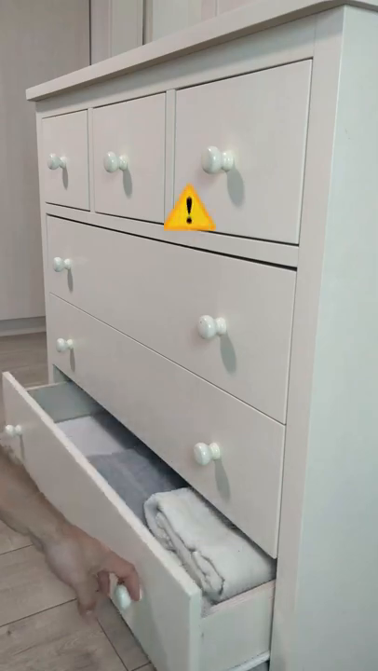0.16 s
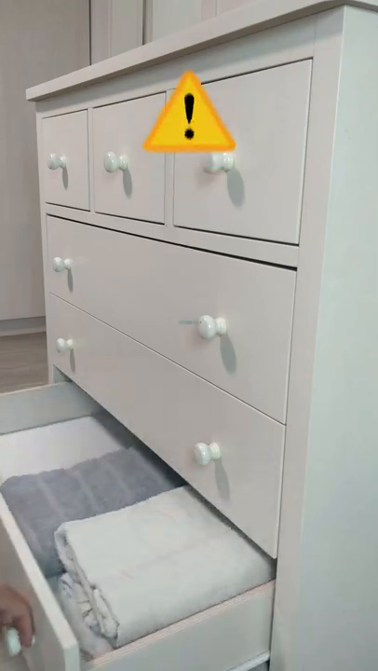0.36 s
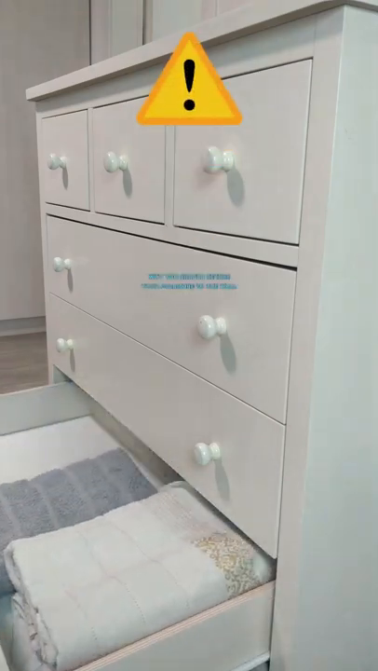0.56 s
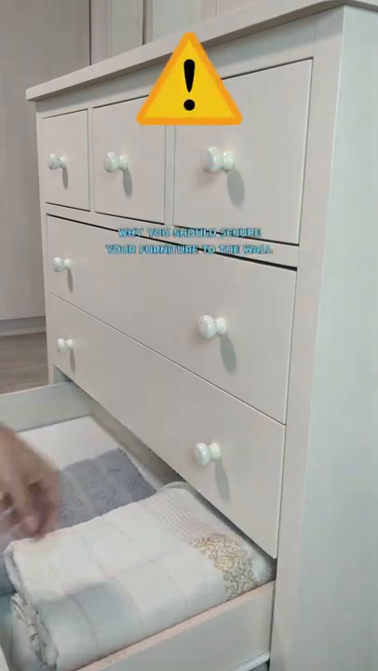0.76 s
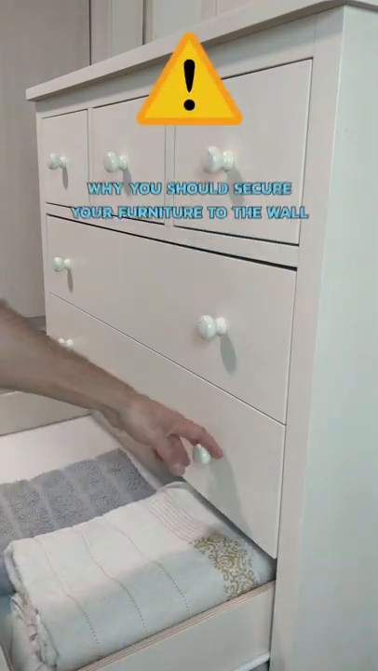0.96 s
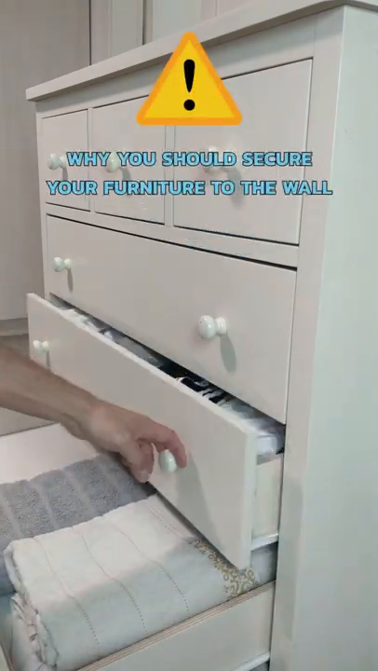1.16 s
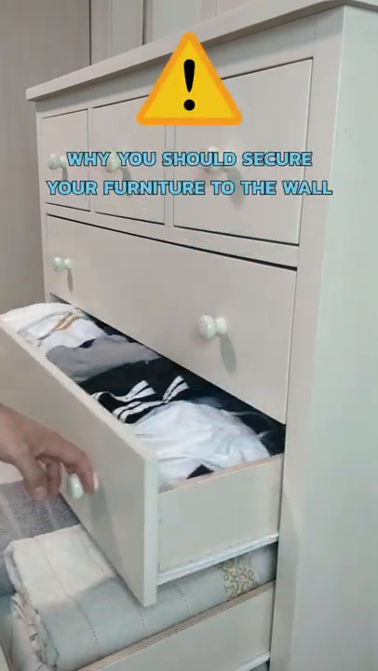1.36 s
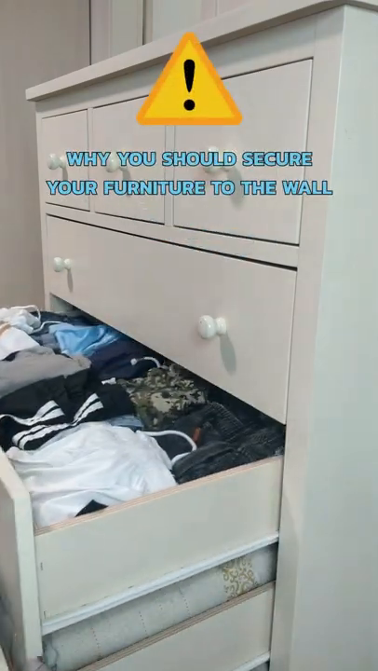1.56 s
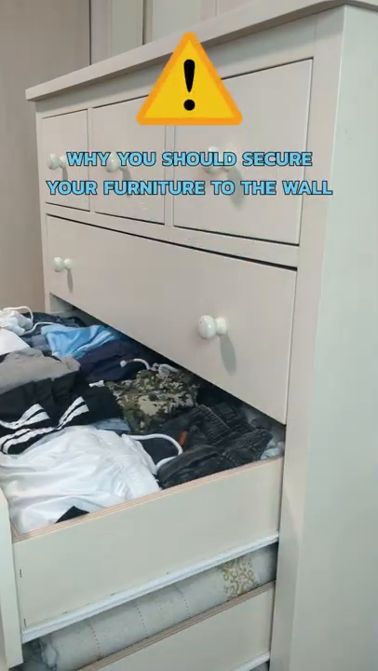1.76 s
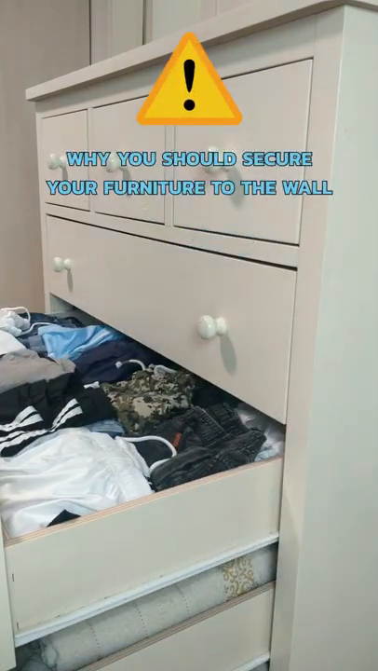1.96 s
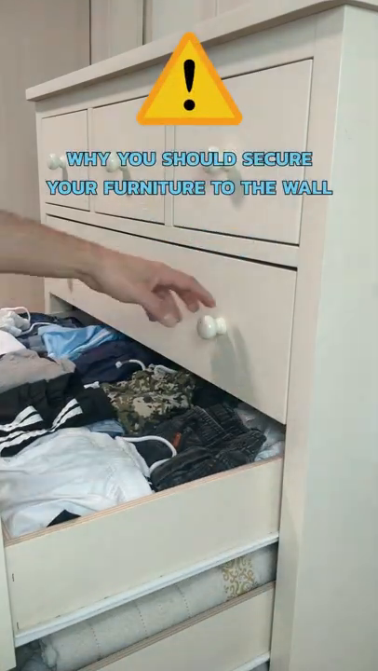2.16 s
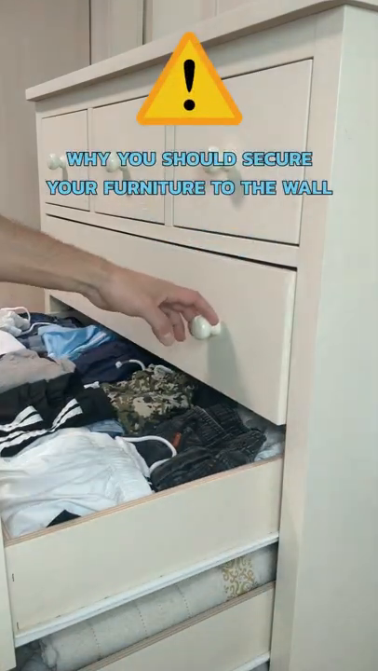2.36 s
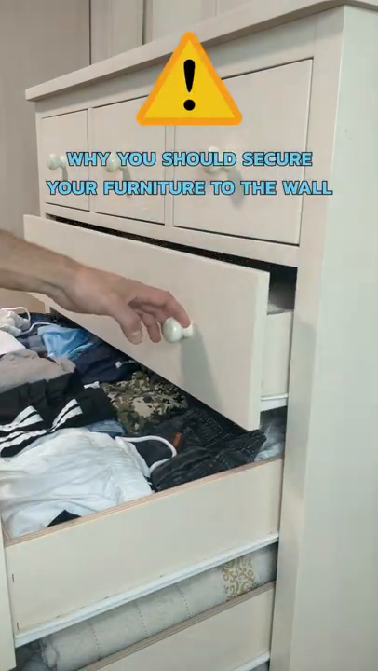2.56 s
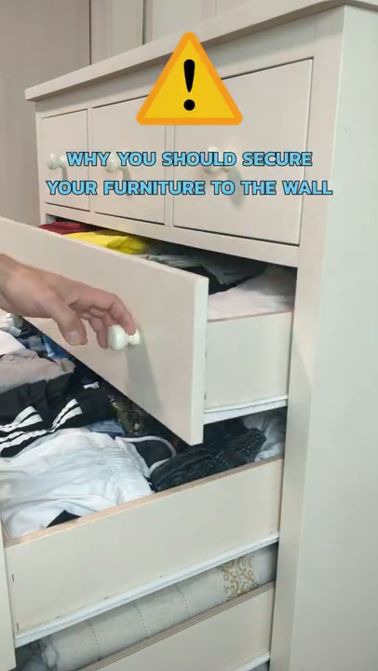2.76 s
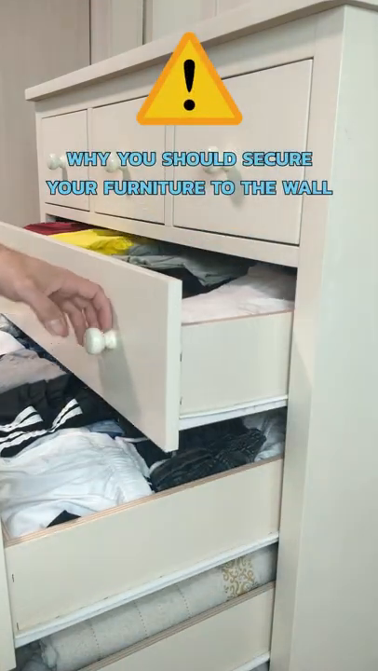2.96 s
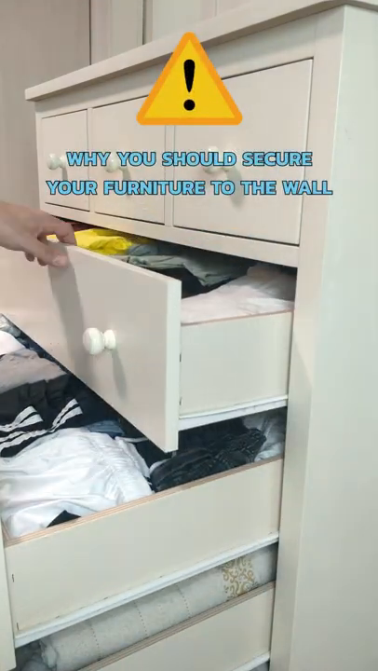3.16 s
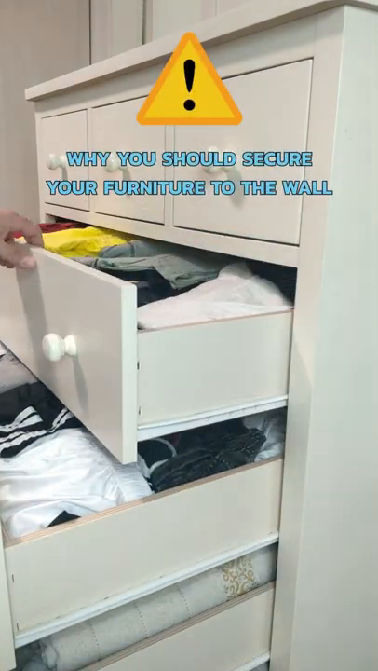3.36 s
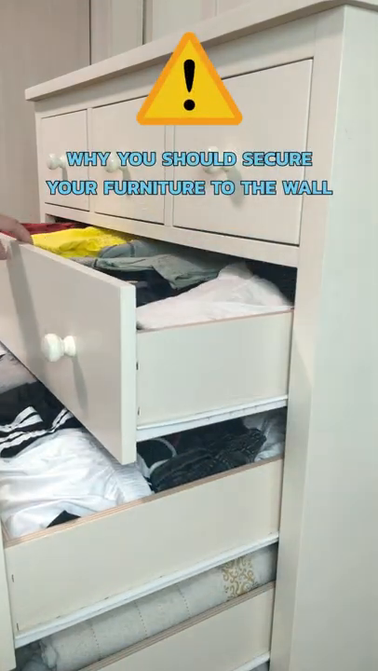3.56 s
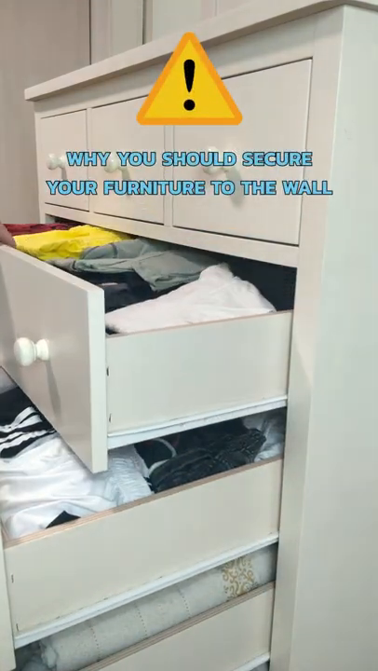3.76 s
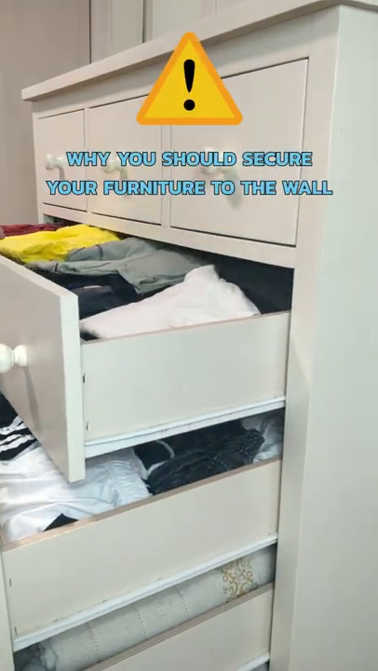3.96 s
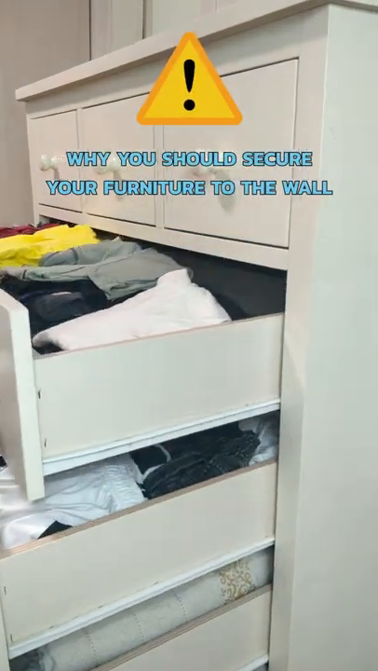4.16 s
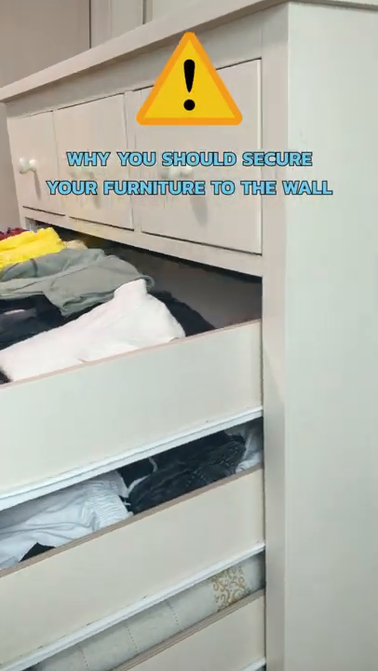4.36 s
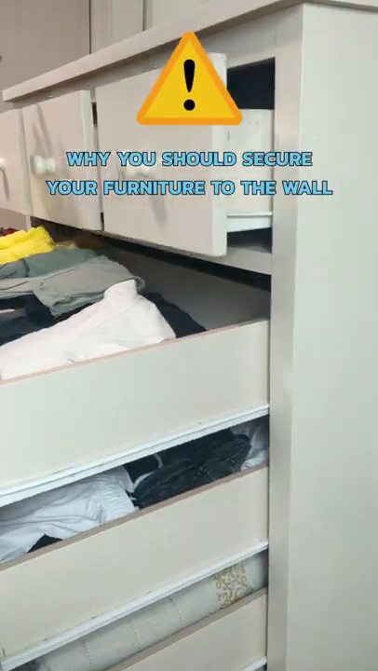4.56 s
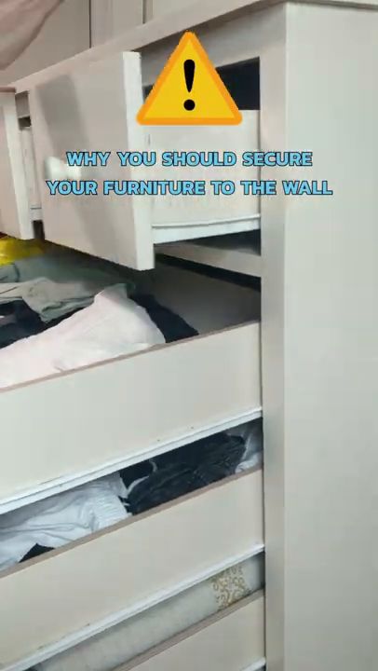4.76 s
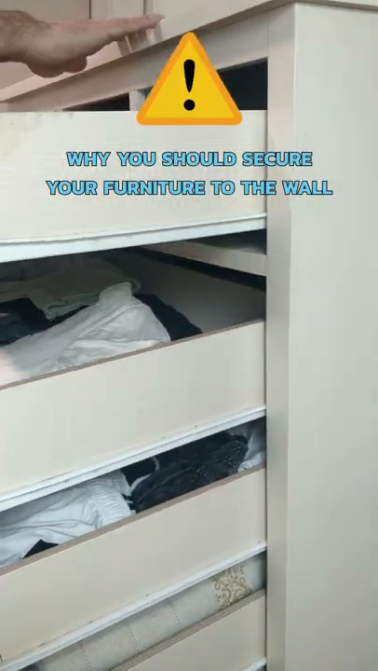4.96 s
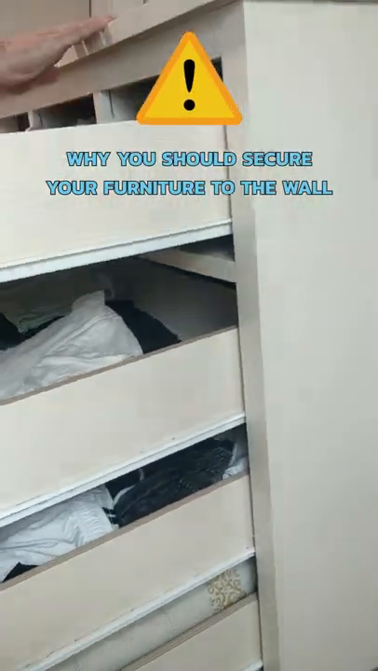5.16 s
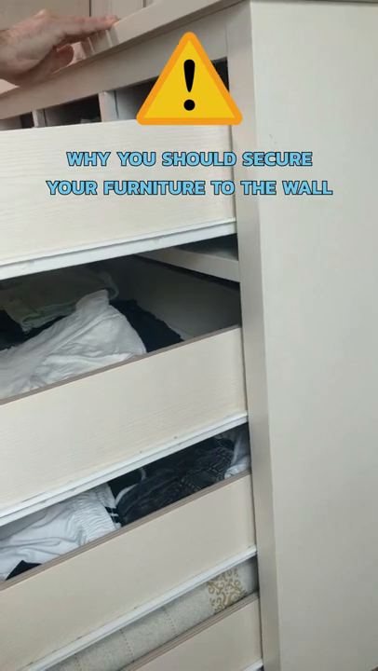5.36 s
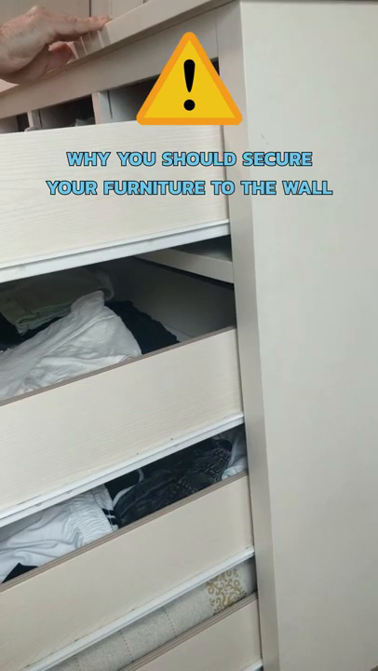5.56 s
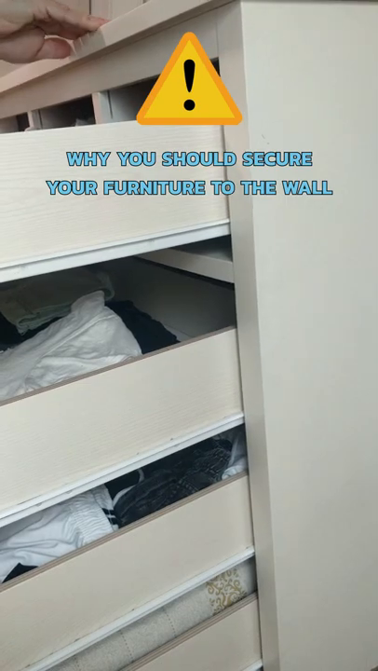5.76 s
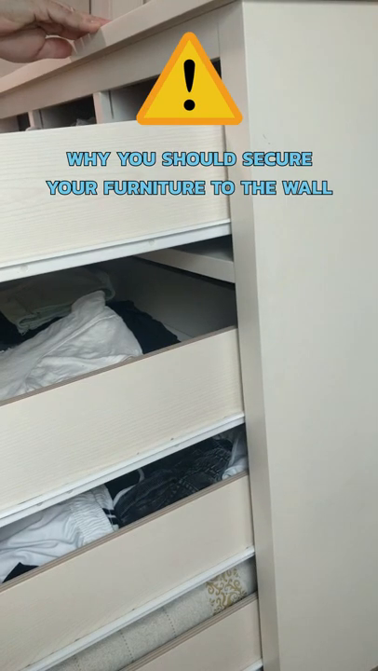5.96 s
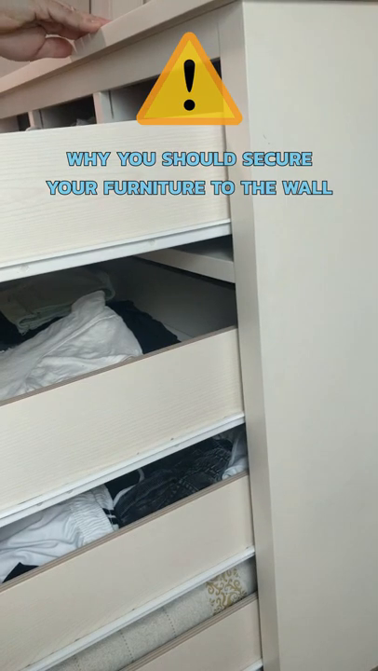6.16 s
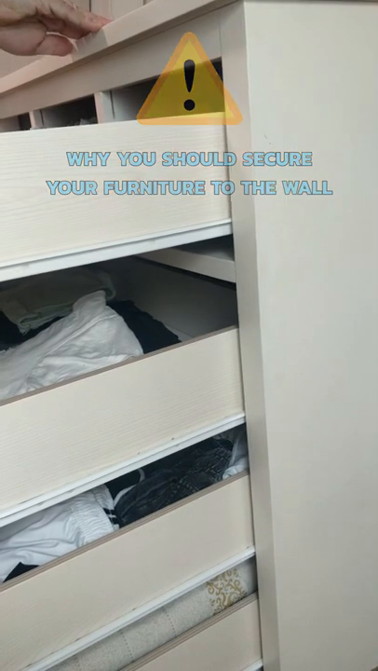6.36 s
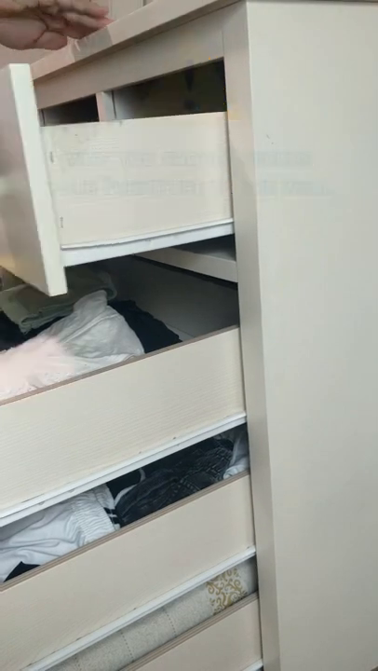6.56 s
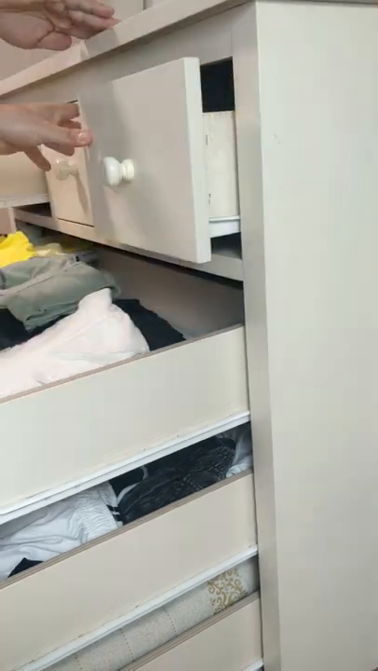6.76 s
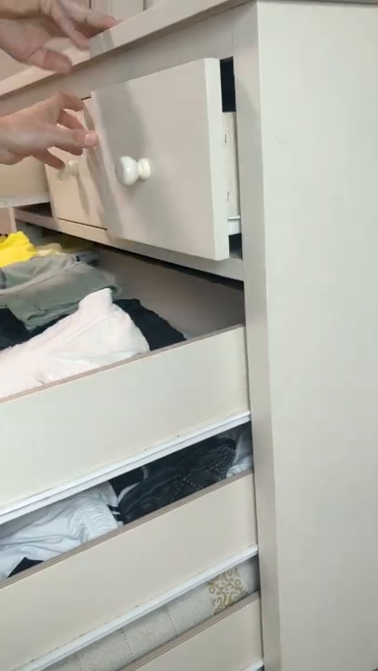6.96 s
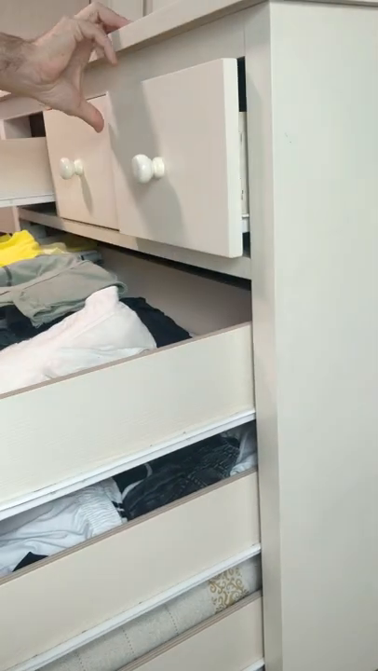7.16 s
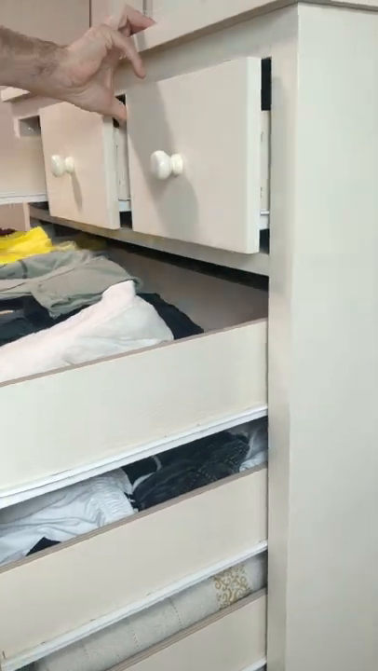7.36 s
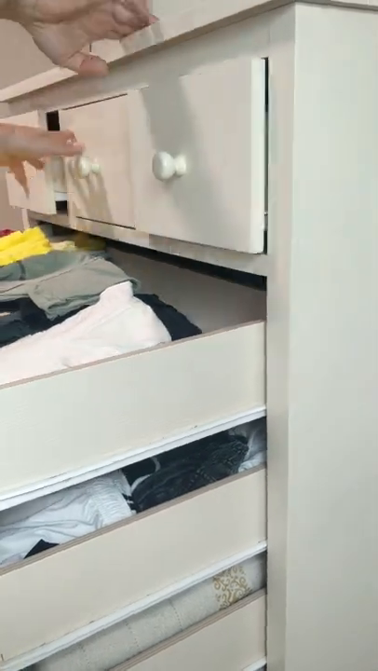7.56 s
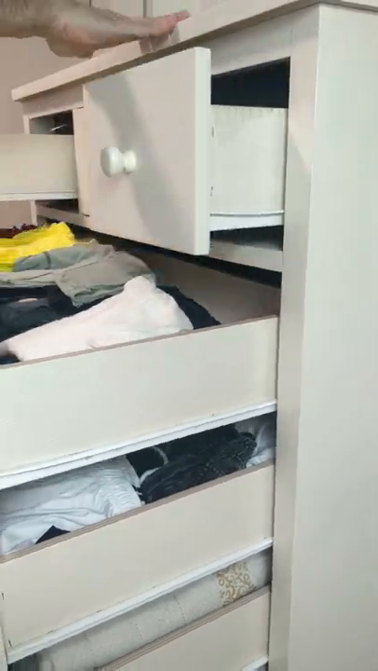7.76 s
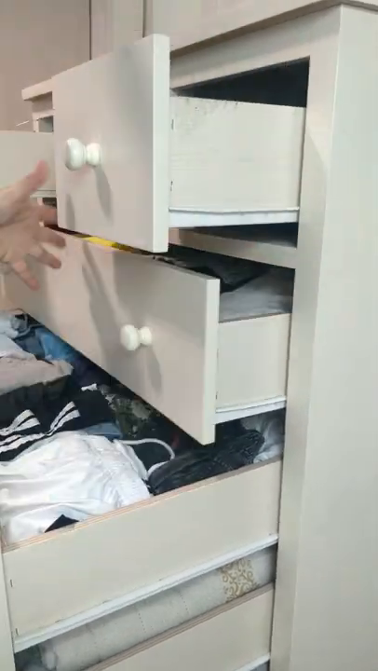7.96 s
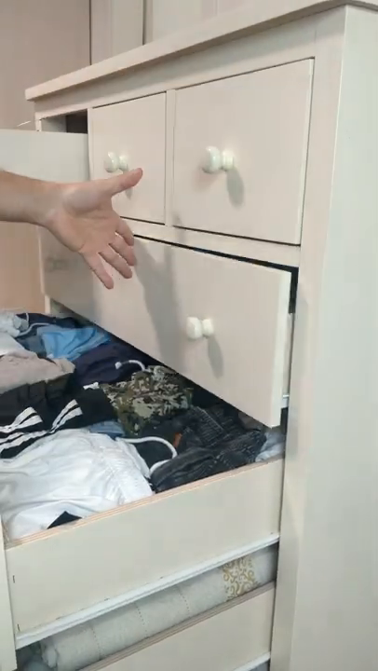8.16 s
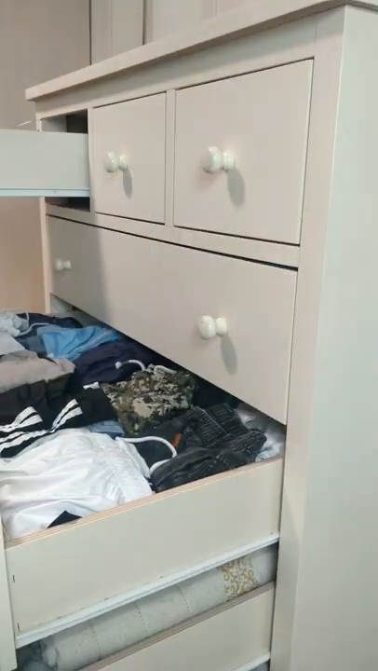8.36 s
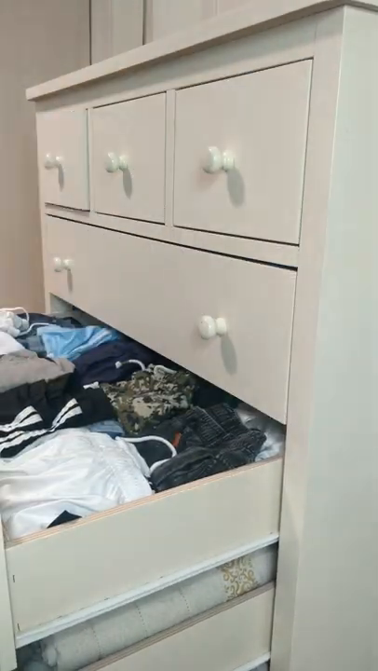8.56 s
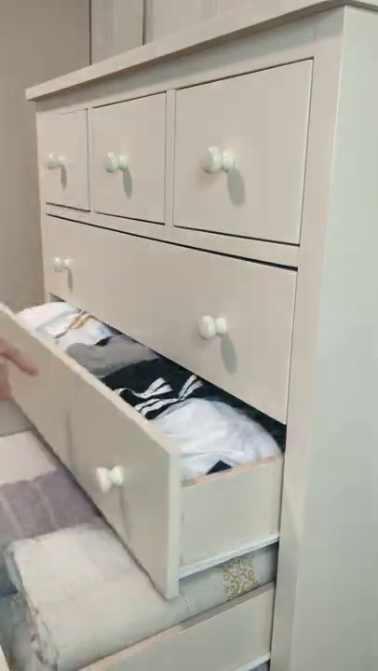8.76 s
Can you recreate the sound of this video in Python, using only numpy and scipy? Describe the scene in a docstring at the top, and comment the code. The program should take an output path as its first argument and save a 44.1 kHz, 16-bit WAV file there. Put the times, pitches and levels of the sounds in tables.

```python
"""In a quiet bedroom, the drawers of a clothes-filled wooden chest are pulled out and later slammed shut.
Each slide is filtered noise that grows with the drawer's speed; some strokes add a pitched roller whirr.
Knocks mix short noise with the ringing of wood panels; booms are low, fading tones.
Straining joints give dry ticks, short bursts of bright noise, as when the chest leans forward.
A short room tail and a faint steady room tone surround it all."""
import sys
import numpy as np
from scipy import signal
from scipy.fft import rfft, irfft, next_fast_len
from scipy.io import wavfile
from scipy.ndimage import uniform_filter1d

SR = 44100
rng = np.random.default_rng(int(sys.argv[2]) if len(sys.argv) > 2 else 0)


def generate_wav(signal):
    """Clip the signal to [-1, 1] and save it as 16-bit WAV at the path in sys.argv[1]."""
    frames = np.transpose(np.atleast_2d(signal))
    scaled = np.clip(frames, -1, 1) * 32767
    pcm = np.round(scaled).astype(np.int16)
    wavfile.write(sys.argv[1], SR, pcm)


N = 392490

# Pulls of a drawer, with faint rubs, a small settle and rattling after a slam. Each row: start in
# seconds, speeding up in seconds, slowing down in seconds, then at top speed: rumble level in dB,
# scrape level in dB, hiss level in dB.
PULLS = [(-0.12, 0.19, 0.19, -38.5, -57, -55.5), (0.06, 0.15, 0.44, -33, -38, -45.5),
         (1.06, 0.29, .33, -32, -40, -49.5), (1.47, 0.088, 0.077, -32, -43, -62.5),
         (1.69, .13, 0.35, -67, -58, -66), (2.22, 0.53, 0.25, -39, -55.5, -60),
         (2.8, .04, 0.16, -44, -55.5, -65.5), (3.075, .02, 0.047, -54, -54, -59),
         (3.21, .12, .1, -46, -57, -67.5), (3.55, 0.12, .26, -53, -69, -79), (3.85, 0.2, 1, -55, -67, -76),
         (4.354, 0.19, 0.23, -28.5, -42.5, -55), (4.68, .18, 0.33, -29.5, -36.5, -52),
         (5.154, 0.056, 0.29, -47, -61.5, -63)]
# Strokes that roll a drawer back in. Each row: the same columns as above.
PUSHES = [(6.35, .27, 0.2, -39, -38, -47), (6.914, 0.088, 0.041, -42, -54, -66.5),
          (7.075, 0.05, 0.086, -52.5, -55.5, -68.5), (7.265, .07, 0.2, -36.5, -37, -49.5),
          (7.37, 0.11, .32, -32.5, -34.5, -44.5), (7.6, 0.28, 0.25, -31, -35, -45.5),
          (8.033, .028, 0.26, -27, -30, -41.5), (8.4, 0.077, 0.23, -36.5, -34, -38.5),
          (8.615, 0.16, 0.2, -33, -38, -45.5)]
# How much quieter a creeping drawer is than one at top speed: rumble in dB, scrape in dB, hiss in dB.
PULL_SWING_DB = [15, 22, 18]
PUSH_SWING_DB = [19.5, 25, 26.5]
GRIP_SPEED = 0.14   # share of top speed below which the runners fade to silence
# Noise colours of the two kinds of slide. Each row: frequency in Hz, relative level in dB.
PULL_COLOUR = [(70, -34), (110, -11.5), (150, 0), (200, -4.5), (255, 1.5), (380, -10), (450, -8.5),
               (590, -23.5), (780, -16.5), (1060, -26), (3000, -32), (4800, -28), (9500, -31.5),
               (16000, -42.5)]
PUSH_COLOUR = [(71, -42), (120, -8), (217, -17.5), (278, -1), (393, -6), (473, 2.5), (684, -16.5),
               (773, -4), (1120, -16), (1400, -15), (2020, -27.5), (2380, -29.5), (3110, -34),
               (4680, -32.5), (16000, -44)]
# Resonances of the drawer boxes. Each row: frequency in Hz, width in Hz, lift in dB.
WIDE_BOX = [(269, 66, 5), (459, 17, 6), (674, 150, 4.5), (1255, 96, 8.5)]
SMALL_BOX = [(294, 50, 2.1), (464, 39, 1.8), (1340, 460, 5.3), (2520, 570, 6.1)]
# Edges in Hz of the rumble, scrape and hiss ranges.
SLIDE_EDGES_HZ = [90, 550, 2500, 17000]
# Colour of the quiet room. Each row: frequency in Hz, relative level in dB.
ROOM_TONE = [(25, -10), (52, -9), (68, -1), (90, -9.5), (120, -22), (200, -13.5), (290, -27.5), (500, -30),
             (1000, -35.5), (2200, -42.5), (3000, -43), (11000, -44), (16000, -48)]
ROOM_TONE_DB = -54
# Ticks of the strained joints. Each row: start in seconds, relative level in dB.
TICKS = [(0.1808, -22.5), (0.2714, -25), (2.835, -41), (2.917, -39.5), (3.0903, -51), (3.2024, -37.5),
         (3.2796, -42.5), (3.6013, -44), (3.633, -47), (3.7374, -44.5), (3.763, -50), (3.8272, -41),
         (4.007, -41), (4.056, -42), (4.0908, -42), (4.144, -41), (4.2402, -39.5), (4.974, -32),
         (5.424, -49.5), (7.7313, -33), (7.957, -23)]
# Colour of a tick. Each row: frequency in Hz, relative level in dB.
TICK_COLOUR = [(1800, -6), (3000, -2), (7000, -3), (15000, -2.5)]
# Knocks of drawers and frame. Each row: start in seconds, thud level in dB, body level in dB,
# clack level in dB, crack level in dB, rattle length in seconds, ring of the struck part in Hz.
KNOCKS = [(0.585, -33, -27, -29, -35, 0.034, 803), (1.026, -61, -62, -69, -53, 0.047, 3510),
          (1.029, -43.5, -40, -60, -68, 0.015, 247), (1.853, -38, -30, -38, -50, 0.015, 435),
          (2.298, -39, -54.5, -51.5, -56, 0.006, 201), (3.045, -56, -52, -57.5, -74, 0.012, 890),
          (3.187, -46, -60, -58, -68, 0.035, 153), (4.349, -38, -59, -61, -69, 0.027, 151),
          (4.461, -33.5, -31, -33, -43.5, 0.03, 235), (5.092, -26, -21.5, -31.5, -34, 0.026, 247.4),
          (5.164, -61, -39, -25.5, -49, 0.0055, 570), (5.172, -31, -24.5, -23, -39.5, 0.026, 996),
          (5.43, -50, -48.5, -55, -94, 0.0081, 437), (5.467, -52, -41, -52, -83, 0.015, 508),
          (6.143, -66.5, -57.5, -64.5, -90, 0.006, 804), (6.357, -54, -50, -53.5, -73, 0.018, 300),
          (6.434, -57, -44.5, -51.5, -61, 0.0076, 284), (6.767, -46, -24.5, -33.5, -43, 0.006, 454),
          (6.837, -51, -55, -44.5, -60.5, 0.0095, 1470), (6.878, -54, -39.5, -40.5, -53, 0.006, 1380),
          (7.132, -65, -45.5, -76, -68, 0.0074, 503), (7.291, -49, -48, -42.5, -51, 0.045, 1390),
          (7.521, -37, -16.5, -23.5, -33.5, 0.029, 295), (7.591, -47, -18.5, -24.5, -39, 0.013, 253),
          (7.879, -42, -25.5, -27.5, -41.5, 0.02, 357), (8.013, -39.5, -38, -37, -34.5, 0.017, 2610),
          (8.133, -35, -19.5, -21, -23, 0.018, 2620), (8.226, -43, -27, -26, -35.5, 0.0013, 1440),
          (8.576, -36.5, -15.5, -22, -30, 0.017, 342)]
# Colour of the wood noise in a knock. Each row: frequency in Hz, relative level in dB.
KNOCK_COLOUR = [(60, -6), (150, -6), (280, -3), (500, -7), (900, -7), (1500, -13), (2000, -20), (2700, -20),
                (5000, -24.5), (16000, -34)]
# Edges in Hz of the thud, body, clack and crack ranges.
KNOCK_EDGES_HZ = [70, 220, 600, 2000, 17000]
# Time in seconds for the noise of thud, body, clack and crack to fall by 60 dB.
KNOCK_T60_S = [0.12, 0.18, 0.13, 0.098]
# Ways the panels ring. Each row: frequency in Hz, relative level in dB, time to fall by 60 dB in seconds.
PANELS = [(150.3, 3, 0.18), (277.5, 2.5, 0.17), (351, -1.5, 0.11), (427.8, -2.5, 0.21), (503, -4, 0.1),
          (599, -10, 0.16), (740, -5.5, 0.086), (980, -8.5, 0.091), (1218, -5, .1), (1388, -3.5, 0.082),
          (2450, -19, .08), (2690, -16, 0.063), (3810, -19, 0.11)]
# Low swings of the chest's body. Each row: start in seconds, frequency in Hz, level in dB before the
# fade, time to fall by 60 dB in seconds.
BOOMS = [(.6, 39, -39, 1.0), (1.858, 41.8, -36, 0.64), (2.776, 39.8, -33, 0.93), (4.47, 42.3, -31, 0.42),
         (5.112, 153.3, -12.5, 0.19), (7.526, 70.6, -25.5, 1), (7.878, 72, -23.5, 0.94),
         (8.134, 72.6, -21, 0.55), (8.575, 71, -26, 0.79)]
# Whirr of the rollers, one list a stroke. Each row: time in seconds, pitch in Hz, level in dB.
WHIRR = [
    [(1.1, 239.7, -44), (1.22, 246, -28), (1.36, 250.3, -41.5), (1.43, 250.4, -29.5), (1.51, 248.4, -39),
     (1.58, 247.5, -26), (1.62, 243, -54)],
    [(4.74, 336.6, -37), (4.9, 476.5, -37), (4.99, 583, -32), (5.03, 543, -29), (5.06, 486, -43)],
    [(6.5, 803, -46), (6.56, 673, -41), (6.75, 490, -31), (6.92, 450.7, -45), (7.04, 491, -53)],
]
# How alike left and right are. Each row: frequency in Hz, likeness from 0 to 1.
LIKENESS = [(100, 0.98), (400, 0.97), (1000, 0.87), (2400, 0.36), (5000, 0.33), (15000, 0.2)]
# Left gets more of the middle, right more of the top. Each row: frequency in Hz, left minus right in dB.
PORT_BALANCE = [(200, 0), (600, 1.5), (2200, 1.2), (4500, 1.6), (8000, 0.5), (14000, -1)]
CUTOFF_HZ = 16000


def from_db(db):
    """Turn decibels into a gain."""
    return 10 ** (np.asarray(db) / 20)


def rms_one(x):
    """Scale a stereo pair so that the average of its two sides has rms 1."""
    return x / np.sqrt(np.mean(x.mean(axis=0) ** 2) + 1e-20)


def in_time(rows):
    """Draw each column of a curve out to every sample."""
    s, *columns = np.transpose(rows)
    return [np.interp(np.arange(N) / SR, s, column) for column in columns]


def at_hz(points, hz):
    """Read a table between its points, on a log-frequency axis."""
    f, value = np.transpose(points)
    return np.interp(np.log(hz + 1), np.log(f), value)


def band(x, low_hz, high_hz):
    """Keep only one range of frequencies."""
    return signal.sosfilt(signal.butter(4, [low_hz, high_hz], "band", fs=SR, output="sos"), x)


def drift(rate):
    """Wander at random around 0, with straight lines between `rate` random points a second."""
    knots = rng.standard_normal(4000)
    return np.interp(np.arange(N) / SR * rate, np.arange(len(knots)), knots)


def add(out, s, sound):
    """Mix a sound in at time s."""
    i = max(round(s * SR), 0)
    out[:, i:i + sound.shape[-1]] += sound[..., :N - i]


def noise(colour, size, resonances=()):
    """Make coloured stereo noise, alike in the bass, that reaches the left slightly first."""
    n = next_fast_len(size)
    hz = np.arange(n // 2 + 1) * SR / n
    level_db = at_hz(colour, hz)
    for f, width, lift in resonances:
        level_db = level_db + lift / (1 + (2 * (hz - f) / width) ** 2)
    alike = np.clip(at_hz(LIKENESS, hz), 0, 1)
    shares = np.sqrt([1 + alike, 1 - alike])
    mid, side = rfft(rng.standard_normal((2, n))) * from_db(level_db) * shares
    left = irfft(mid + side, n)
    right = np.roll(irfft(mid - side, n), 2)   # two samples later
    return rms_one(np.array([left, right])[:, :size])


def speed(start_s, rise_s, fall_s):
    """One stroke: the drawer's speed arches from rest up to 1 and back to rest."""
    since_start = np.arange(N) / SR - start_s
    return np.sin(np.pi * np.interp(since_start, [0, rise_s, rise_s + fall_s], [0, .5, 1]))


def friction_gains(strokes, swing_db):
    """Rumble, scrape and hiss grow louder with the drawer's speed, each by its own swing in decibels."""
    power = np.zeros((len(swing_db), N))
    for start_s, rise_s, fall_s, *top_db in strokes:
        v = speed(start_s, rise_s, fall_s)
        moving = v > 1e-6
        v = v[moving]
        level_db = np.c_[top_db] - np.c_[swing_db] * (1 - v)
        grip = np.minimum(v / GRIP_SPEED, 1)
        power[:, moving] += (grip * from_db(level_db)) ** 2
    return np.sqrt(power)


def wander(x, depth_db, size):
    """As the contact travels, parts of the sound swell and fade, most strongly the low ones."""
    hz, _, cells = signal.stft(x, SR, nperseg=1024)
    field = rng.standard_normal(cells.shape[1:])
    field = uniform_filter1d(field, size=size, axis=1)   # smooth in time
    field = uniform_filter1d(field, size=2, axis=0)      # smooth in frequency
    depth_db = depth_db / (1 + hz[:, None] / 3000)
    cells = cells * from_db(depth_db * field / field.std())
    return signal.istft(cells, nperseg=1024)[1][:, :N]


def grit(per_s, grain_s):
    """Tiny bumps in the runner, at random moments and of uneven size, each quickly fading."""
    bumps = (rng.random(N) < per_s / SR) * rng.exponential(1, N)
    return signal.lfilter([1], [1, -np.exp(-1 / (grain_s * SR))], bumps + 1e-18)


def slide(gains, colour, box, judder_db, judder_rate, grit_db, patchy_db):
    """Runner friction shakes the drawer box: the load judders, grit roughens the scrape and the hiss."""
    friction = wander(noise(colour, N, box), patchy_db, size=7)
    judder = from_db(judder_db * drift(judder_rate))
    grains = np.sqrt(1 + from_db(grit_db) * grit(per_s=270, grain_s=0.0022))
    out = 0
    for k, gain in enumerate(gains):
        roughness = grains if k else 1   # the rumble has no grit
        part = band(friction * judder * roughness, *SLIDE_EDGES_HZ[k:k + 2])
        # level out the noise's short-term loudness, so the gain curve sets it
        part = part / np.sqrt(uniform_filter1d(part.mean(axis=0) ** 2, size=2000) + 1e-12)
        out = out + gain * part
    return out


def room_tone():
    """The quiet room itself: a faint, steady noise, strongest in the bass."""
    return from_db(ROOM_TONE_DB) * noise(ROOM_TONE, N)


def ticks(level_db, snap_s, tail_db, tail_s):
    """A joint slips: a bright, very short snap with a fainter tail."""
    out, t = np.zeros((2, N)), np.arange(SR // 8) / SR
    for s, db in TICKS:
        fade = np.exp(-t / snap_s) + from_db(tail_db) * np.exp(-t / tail_s)
        add(out, s, from_db(db + level_db) * fade * noise(TICK_COLOUR, len(t)))
    return out


def panel_ring(t):
    """A blow lands on a new spot each time and shares itself differently among the panel modes."""
    ring = 0
    for hz, db, t60 in PANELS:
        uneven_db = db + 2 * rng.standard_normal()
        tone = rng.choice([-1, 1]) * np.sin(2 * np.pi * hz * t)
        ring = ring + from_db(uneven_db - 60 * t / t60) * tone
    return ring


def knocks(modes_db, main_db, main_t60, snap_db, snap_s, rise_s):
    """A drawer meets its stop: a snap, a short rattle, then panel modes and noisy wood die away."""
    out, t = np.zeros((2, N)), np.arange(SR // 3) / SR
    blow = SR // 20   # a knock's levels are those of its first 50 ms
    for s, *levels_db, rattle_s, main_hz in KNOCKS:
        wood = noise(KNOCK_COLOUR, len(t))
        ring = from_db(modes_db) * panel_ring(t)
        # the struck part has its own ring, longer if it is low or rattles
        t60 = (main_t60 + 2 * rattle_s) * np.sqrt(400 / main_hz)
        struck_db = main_db + .4 * at_hz(KNOCK_COLOUR, main_hz)
        struck = from_db(struck_db - 60 * t / t60) * np.sin(2 * np.pi * main_hz * t)
        onset = 1 - np.exp(-t / rise_s)
        for k, level_db in enumerate(levels_db):
            held_s = rattle_s / (1 + 0.14 * k)   # the soft rattle feeds the low ranges longest
            fade = from_db(-60 * np.maximum(t - held_s, 0) / KNOCK_T60_S[k])
            treble_weight = (k / len(levels_db)) ** 2   # first contact weighs most in the treble
            snap = from_db(snap_db) * np.exp(-t / snap_s) * treble_weight
            mix = onset * (wood * (fade + snap) + ring + struck)
            part = band(mix, *KNOCK_EDGES_HZ[k:k + 2])
            add(out, s, from_db(level_db) * part / part[:, :blow].mean(axis=0).std())
    return out


def booms(rise_s):
    """The loaded chest swings at a low pitch, given for each blow: a tone rises softly and dies away."""
    out, t = np.zeros((2, N)), np.arange(SR) / SR
    for s, hz, db, t60 in BOOMS:
        fade = from_db(db - 60 * t / t60)
        onset = 1 - np.exp(-t / rise_s)
        add(out, s, fade * onset * np.sin(2 * np.pi * hz * t))
    return out


def rollers(stroke, width_hz):
    """Rolling makes a narrow, rough whirr that follows the stroke's pitch curve; silent outside it."""
    hz, level_db = in_time(stroke)
    t = np.arange(N) / SR
    rolling = (t > stroke[0][0]) & (t < stroke[-1][0])
    turn = 2 * np.pi * np.cumsum(hz) / SR
    whirr = drift(width_hz) * np.cos(turn) + drift(width_hz) * np.sin(turn)
    steady = whirr / np.sqrt(uniform_filter1d(whirr ** 2, size=2000) + 1e-12)
    return rolling * from_db(level_db) * steady


def bedroom(x, wet_db, t60, first_echo_s):
    """A furnished room answers with a short, blurred tail of fading noise."""
    t = np.arange(SR * 2 // 3) / SR
    colour = [(50, 7.0), (200, 3.5), (600, -2.0), (4000, -4), (15000, 0)]   # Hz, relative dB
    tail = noise(colour, len(t)) * from_db(-60 * t / t60) * (t > first_echo_s)
    tail = tail / np.sqrt(np.sum(tail ** 2) / 2)
    return from_db(wet_db) * signal.fftconvolve(x, tail, axes=1)[:, :N]


def ports(x):
    """Share a sound between the two microphone ports, left and right, range by range."""
    n = next_fast_len(N)
    lean_db = at_hz(PORT_BALANCE, np.arange(n // 2 + 1) * SR / n)
    return irfft(rfft(x, n) * from_db([lean_db / 2, -lean_db / 2]), n)[:, :N]


def scene():
    """Slides and blows of the chest, a little to the left, in a quiet room."""
    pull = slide(friction_gains(PULLS, PULL_SWING_DB), PULL_COLOUR, WIDE_BOX,
                 judder_db=1.5, judder_rate=48, grit_db=-8.0, patchy_db=4.5)
    push = slide(friction_gains(PUSHES, PUSH_SWING_DB), PUSH_COLOUR, SMALL_BOX,
                 judder_db=2.5, judder_rate=53, grit_db=-1.5, patchy_db=4.0)
    joints = ticks(level_db=-5.5, snap_s=0.0013, tail_db=-11.5, tail_s=0.02)
    blows = knocks(modes_db=-1.5, main_db=11.0, main_t60=.06, snap_db=15.0, snap_s=0.0029, rise_s=0.0009)
    # a higher whirr is also broader
    whirr = sum(rollers(stroke, width_hz=.3 * stroke[1][1]) for stroke in WHIRR)
    chest = pull + push + joints + blows + booms(rise_s=0.0081) + whirr
    room = bedroom(chest, wet_db=-20, t60=0.39, first_echo_s=0.0087)
    return ports(chest + room) + room_tone()


def record(dry):
    """Peaks stop at full scale, then the highest treble is cut."""
    top_cut = signal.ellip(10, .1, 80, CUTOFF_HZ, fs=SR, output="sos")
    return signal.sosfilt(top_cut, np.clip(dry, -1, 1))


dry = scene()
out = record(dry)
generate_wav(out)
```